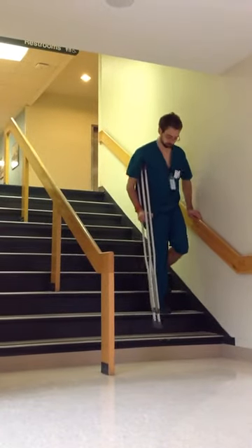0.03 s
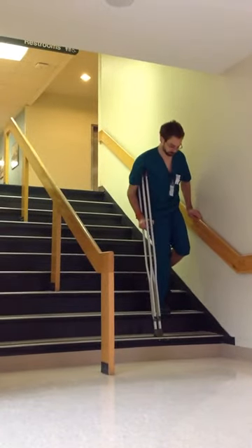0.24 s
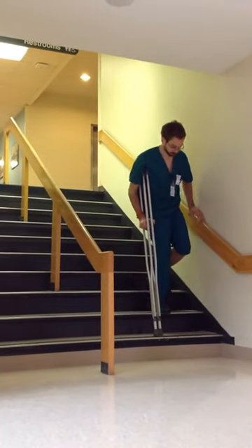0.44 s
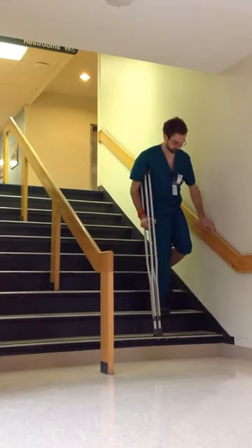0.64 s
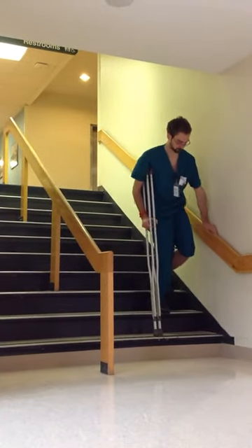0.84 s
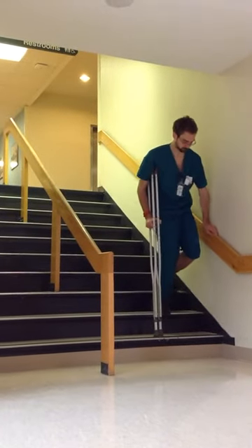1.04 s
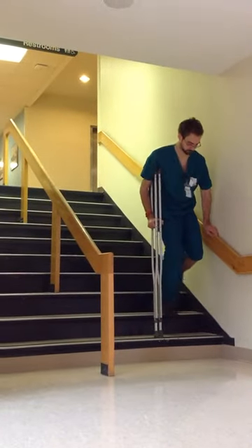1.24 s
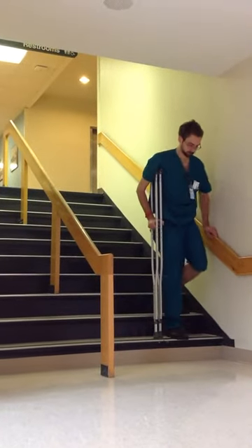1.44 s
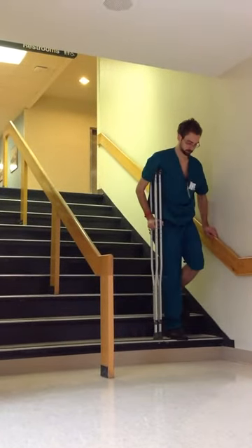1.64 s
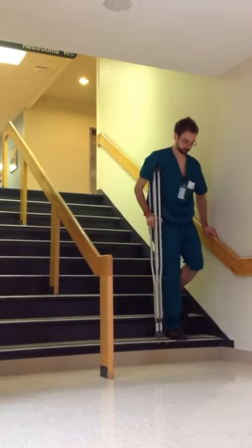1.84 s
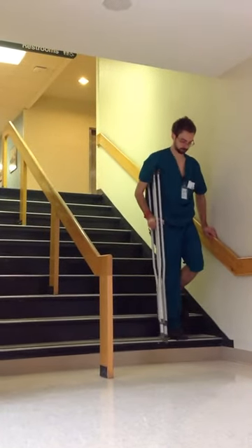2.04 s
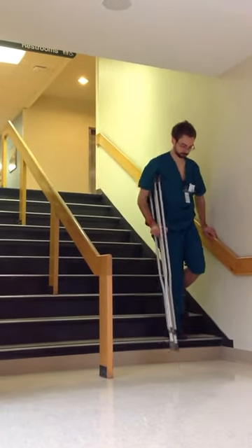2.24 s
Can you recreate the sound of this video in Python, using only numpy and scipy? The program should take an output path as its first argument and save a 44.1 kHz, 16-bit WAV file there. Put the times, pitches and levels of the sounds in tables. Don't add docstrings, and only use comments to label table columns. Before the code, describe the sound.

Two aluminium crutches land almost together with a loud, bright clack on a stair step, echoing in a hard stairwell; a shoe then thuds and scuffs, and loose crutch parts tick, over faint ventilation hum.

```python
import sys
import numpy as np
from scipy import signal
from scipy.fft import rfft, irfft, next_fast_len
from scipy.io import wavfile
from scipy.ndimage import map_coordinates

SR = 44100
rng = np.random.default_rng(int(sys.argv[2]) if len(sys.argv) > 2 else 0)


def convert_level_to_amplitude(level_db):
    exponent = np.asarray(level_db, float) / 20
    return 10 ** exponent


def persist_wave(psi):
    counts = np.round(np.clip(psi, -1, 1) * 32767).astype(np.int16)
    wavfile.write(sys.argv[1], SR, np.atleast_2d(counts).T)


N = 101429


# (time [s], rattle [s], shaft knock [dB], tube ring [dB])
CLACKS = [
    (.2271, 0.011, 6, -1),
    (.2298, 0.011, 4.5, -1.5),
    (.2437, 0.0016, -1.5, -0.5),
]
# (centre [Hz], width [Hz], level [dB])
SHAFT = [(126, 58, -20.5), (434, 234, -18), (756.5, 80, -1), (963, 81, 1), (1162, 165, -3), (1637, 223, -1),
         (2510, 620, -4), (2846, 400, -2), (3630, 1020, -9.5), (4750, 390, -7.5)]
# (centre [Hz], width [Hz], level [dB])
TUBE = [(5680, 770, -0.5), (7400, 1100, 0.5), (8800, 2000, -2.5), (11140, 970, 0), (13000, 990, -4.5),
        (15060, 1200, -5.5)]
# (time [s], rattle [s], tip edge [dB], tube snap [dB])
SNAPS = [
    (.2272, 0.0053, 10.5, -5),
    (.2297, 0.0061, 13, -10),
    (.2417, .004, 1.5, -2),
    (.2437, 0.0013, -3.5, 11.5),
]
# (centre [Hz], width [Hz], level [dB])
EDGE = [(2525, 287, 3), (3800, 840, -12), (5400, 990, -3.5), (7300, 800, -7)]
# (centre [Hz], width [Hz], level [dB])
SNAP = [(7040, 1300, 2), (9300, 1700, -1.5), (10700, 1160, 3.5)]
# (centre [s], spread [s], level [dB])
SWING = (0.18, 0.16, -62.5)
# (centre [Hz], width [Hz], level [dB])
BRUSH = [(1610, 360, -5), (833, 100, -2)]


def crutches():
    centre_s, spread_s, brush_db = SWING
    t = np.arange(N) / SR
    stroke = np.exp(-((t - centre_s) / spread_s) ** 2)
    brush = convert_level_to_amplitude(brush_db) * stroke * unit(rung(rng.standard_normal(N), BRUSH))
    snaps = contacts(SNAPS, EDGE, SNAP)
    clacks = contacts(CLACKS, SHAFT, TUBE, room_db=9)
    return brush + snaps + clacks


# (time [s], contact [s], thud [dB], sole tick [dB])
STEPS = [
    (1.205, 0.022, -17.5, -39),
    (1.391, 0.018, -4.5, -29),
    (1.418, 0.03, -6.5, -42),
    (1.46, 0.022, -13.5, -45),
    (1.568, 0.0046, -24, -38.5),
]
# (time [s], contact [s], thud [dB], sole tick [dB])
HEEL = [
    (1.392, 0.0027, -6.5, -26),
    (1.4185, 0.0012, -7.5, -43),
]
# (centre [Hz], width [Hz], level [dB])
TREAD = [(149, 74, -4.5), (384.4, 136, 4), (545, 142, 7.5), (680, 157, 3.5), (1010, 300, -5),
         (1900, 740, -16.5)]
# (centre [Hz], width [Hz], level [dB])
SOLE = [(1600, 700, -2), (5300, 1100, 0.5)]
SCUFF_S = [.07, .79, 1.215, 1.42, 1.8]
# (rise [s], fall [s], level [dB])
SCUFFS = [(.1, .1, -71), (.03, 0.044, -68), (0.028, .03, -61), (0.025, 0.22, -58.5), (0.052, .12, -68)]
# (frequency [Hz], density [dB per Hz])
RUB = [(500, -19), (1500, 8), (4000, -1), (9000, -3.5), (15000, -3)]


def shoe():
    t = np.arange(N) / SR
    stroke = np.zeros(N)
    for peak_s, (rise_s, fall_s, db) in zip(SCUFF_S, SCUFFS):
        fade = np.where(t < peak_s, ((peak_s - t) / rise_s) ** 2, (t - peak_s) / fall_s)
        stroke += convert_level_to_amplitude(db) * np.exp(-fade)
    grain = rng.standard_normal(N) * convert_level_to_amplitude(1.2 * wobble(150))
    rub = unit(filtered(grain, lambda f: convert_level_to_amplitude(along(RUB, f))))
    landings = contacts(STEPS, TREAD, SOLE, room_db=3)
    thumps = contacts(HEEL, TREAD, SOLE)
    return landings + thumps + stroke * rub


# (time [s], rattle [s], bright pin ring [dB], dull clamp knock [dB])
TICKS = [
    (.070, .01, -33, -56),
    (1.7165, 0.0091, -36, -25),
    (1.7385, .015, -17.5, -29.5),
    (1.8075, 0.018, -8.5, -24),
    (1.828, 0.11, -24, -26),
    (1.931, 0.019, -40, -25),
]
# (centre [Hz], width [Hz], level [dB])
PIN = [(4500, 210, -17), (5100, 500, -10.5), (5790, 160, 3.5), (6250, 270, -4.5), (7300, 620, -14),
       (8200, 460, -14), (9500, 1300, -16.5), (10930, 300, -11), (11150, 340, -13), (13500, 2800, -30)]
# (centre [Hz], width [Hz], level [dB])
CLAMP = [(1500, 500, 3), (2300, 500, -1.5), (2920, 500, -1.5), (3700, 700, -3), (4700, 800, -2.5)]


def ticks():
    return contacts(TICKS, PIN, CLAMP, room_db=-7)


# (frequency [Hz], density [dB per Hz])
AIR = [(18, -79.5), (30, -52), (130, -20), (173, -4), (389, -12.5), (897, -18), (1110, -21), (1770, -26.5),
       (15500, -38.5)]


def ventilation():
    air = unit(filtered(rng.standard_normal(N), lambda f: convert_level_to_amplitude(along(AIR, f))))
    duct = unit(rung(rng.standard_normal(N), [(176, 40, 0)]))
    air_db = -58.5 + 0.4 * wobble(4)
    duct_db = -60 + 1.52 * wobble(4.4)
    return convert_level_to_amplitude(air_db) * air + convert_level_to_amplitude(duct_db) * duct


def contacts(rows, body_a, body_b, room_db=None):
    drive = np.zeros((2, N + 2 * SR))
    for time_s, rattle_s, a_db, b_db in rows:
        hit = np.zeros(2048) if room_db is None else tail(room_db)
        burst = convert_level_to_amplitude(-20 * np.arange(2048) / SR / rattle_s) * rng.standard_normal(2048)
        hit[:2048] += burst / np.linalg.norm(burst)
        start = round(time_s * SR)
        drive[:, start:start + len(hit)] += convert_level_to_amplitude([[a_db], [b_db]]) * hit
    return rung(drive[0, :N], body_a) + rung(drive[1, :N], body_b)


# (frequency [Hz], time to fall 60 dB [s])
HALL = [(100, 1.2), (500, 1.86), (1000, 1.755), (2000, 1.18), (4000, 1.09), (7500, 0.61), (11000, 0.43),
        (15000, 0.29)]
# (frequency [Hz], echo energy over the direct sound [dB])
HALL_DB = [(200, 12), (1000, 4), (4000, 3), (12000, 0.5)]


def tail(room_db):
    build_s = 0.0013
    hz, t, noise = signal.stft(rng.standard_normal(3 * SR // 2), SR, nperseg=256)
    t60 = along(HALL, hz)[:, None]
    level_db = along(HALL_DB, hz)[:, None] + room_db
    unit_energy = np.sqrt(6 * np.log(10) / t60 / SR)
    shaped = noise * convert_level_to_amplitude(-60 * t / t60 + level_db) * unit_energy
    echo = signal.istft(shaped, SR, nperseg=256)[1]
    return echo * (1 - np.exp(-np.arange(len(echo)) / SR / build_s))


def rung(x, body):
    def response(f):
        total = 0
        for k, (centre, width, db) in enumerate(body):
            damping = 1j * f * width
            total = total + (-1) ** k * convert_level_to_amplitude(db) * damping / (centre ** 2 - f ** 2 + damping)
        return total
    return filtered(x, response)


def filtered(x, response):
    m = next_fast_len(len(x) + SR // 2)
    return irfft(rfft(x, m) * response(np.fft.rfftfreq(m, 1 / SR)), m)[:len(x)]


def along(points, hz):
    f, v = np.transpose(points)
    return np.interp(np.log(hz + 1), np.log(f + 1), v)


def wobble(rate):
    knots = rng.standard_normal(int(N * rate / SR) + 4)
    return map_coordinates(knots, [np.arange(N) * rate / SR])


def unit(x):
    return x / np.sqrt(np.mean(x ** 2) + 1e-20)


def scene():
    return (crutches() + shoe() + ticks() + ventilation())[None]


def roll_off(x):
    return signal.sosfilt(signal.butter(12, 16850, fs=SR, output="sos"), x)


def record(dry):
    low_hz, top_hz = 55.6, 15300

    def band(f):
        return (1j * f / (low_hz + 1j * f)) ** 2 / (1 + (f / top_hz) ** 150)
    mix = filtered(dry[0], band)[None]
    return roll_off(mix)


dry = scene()
out = record(dry)
persist_wave(out)
```